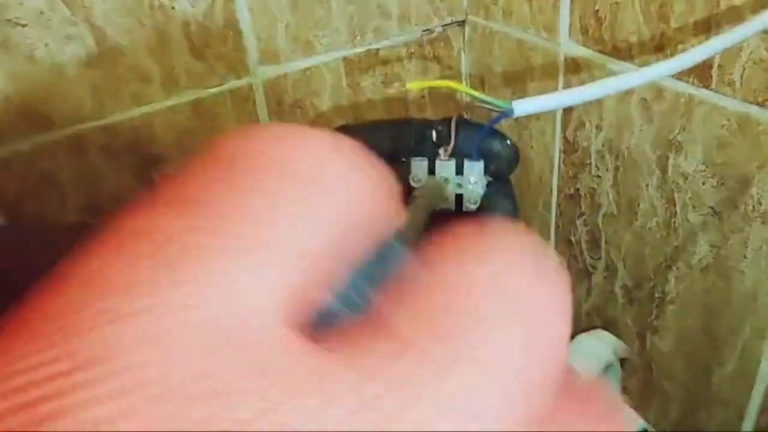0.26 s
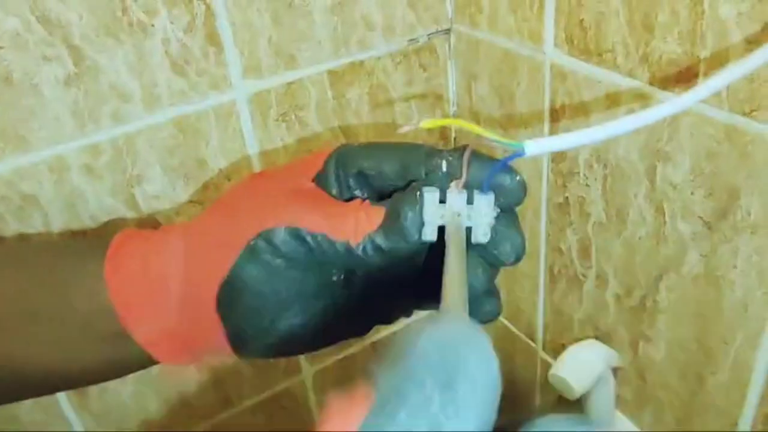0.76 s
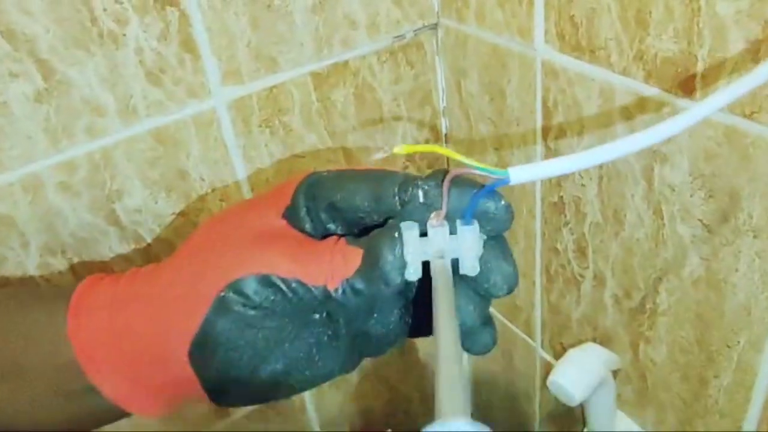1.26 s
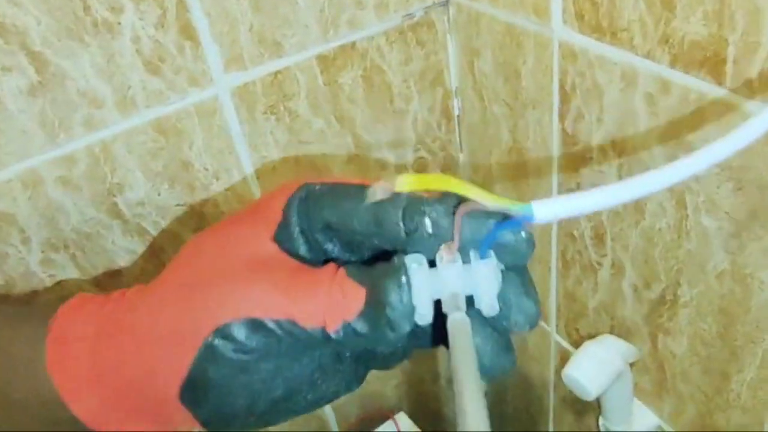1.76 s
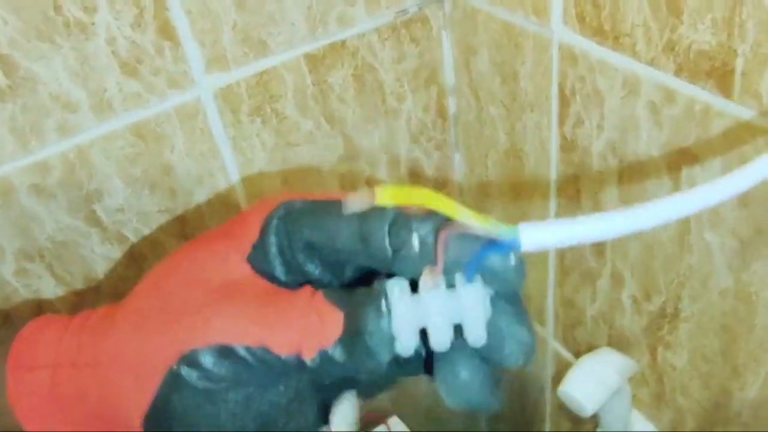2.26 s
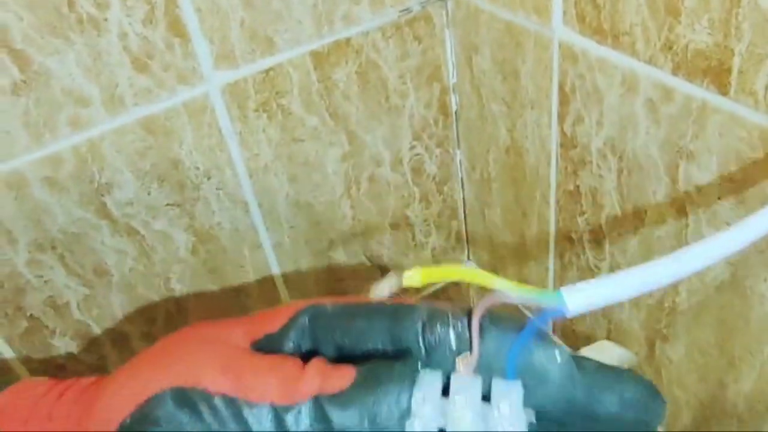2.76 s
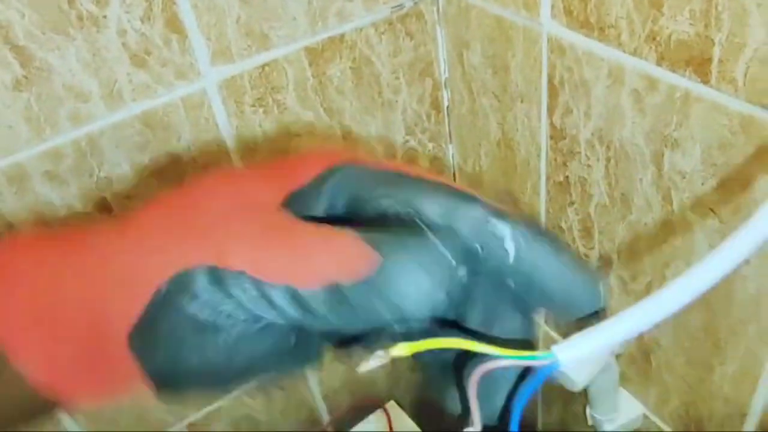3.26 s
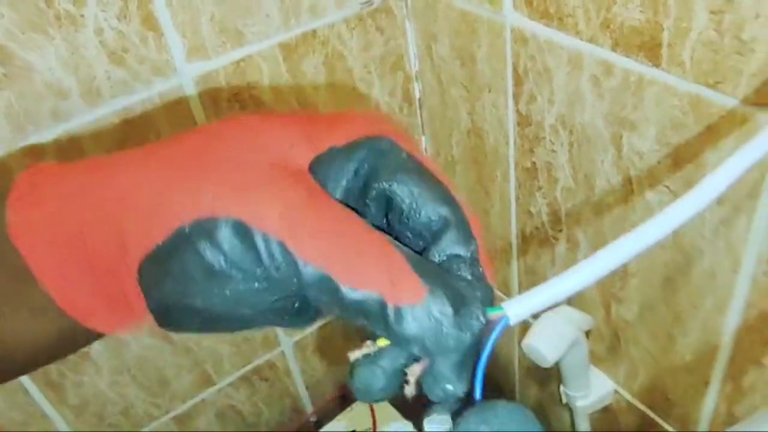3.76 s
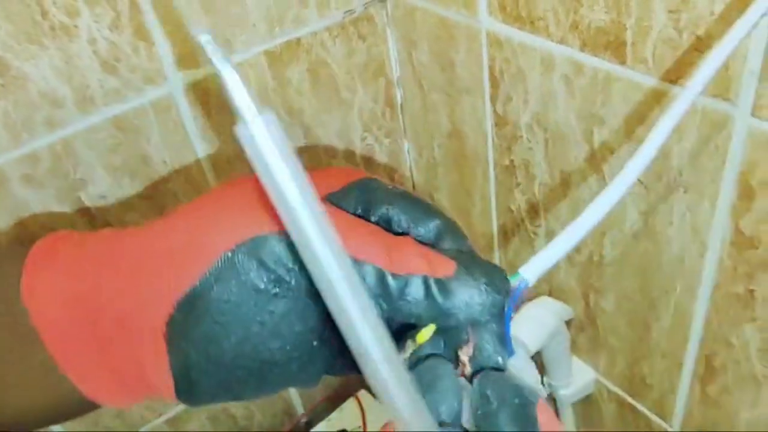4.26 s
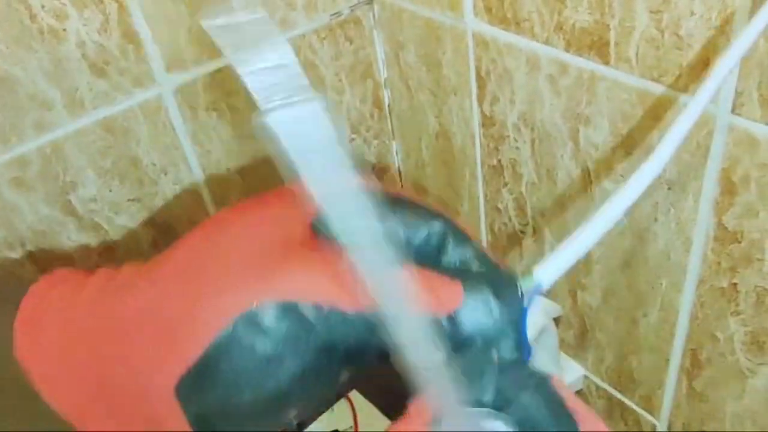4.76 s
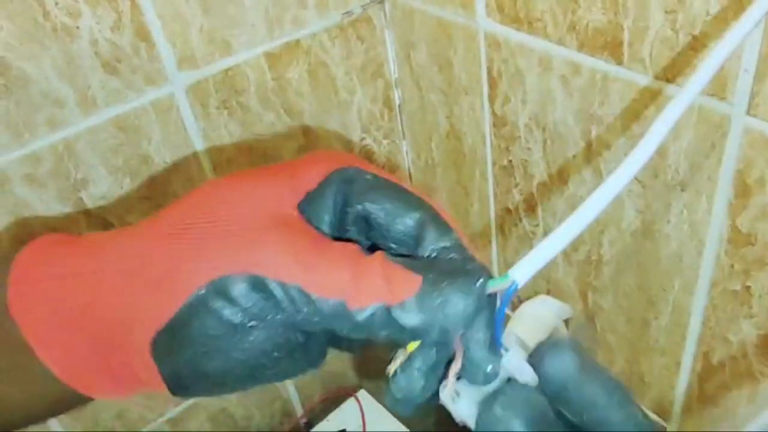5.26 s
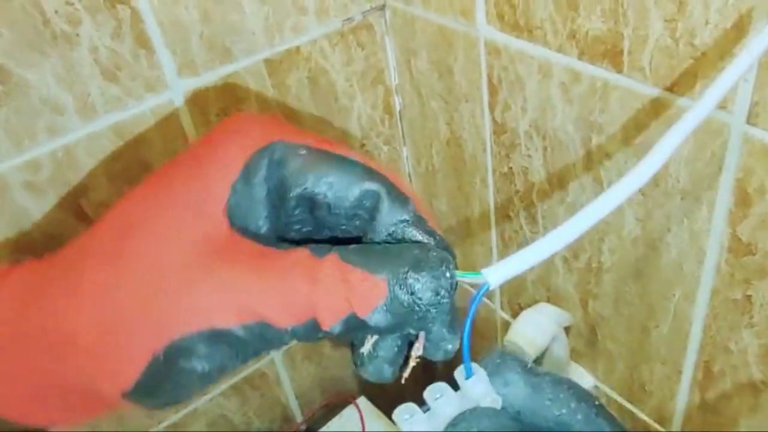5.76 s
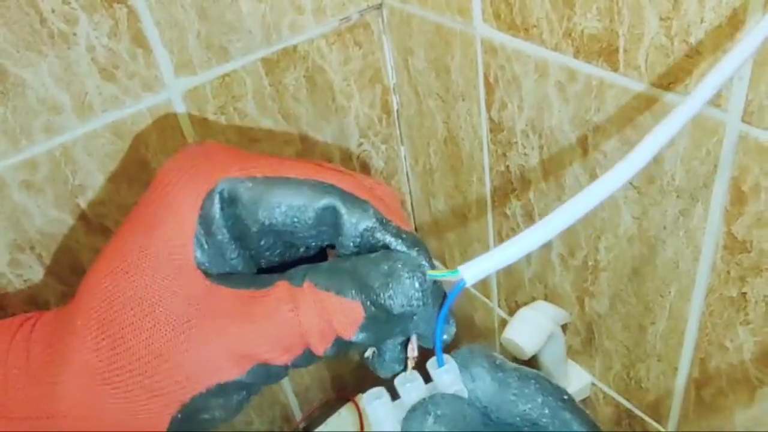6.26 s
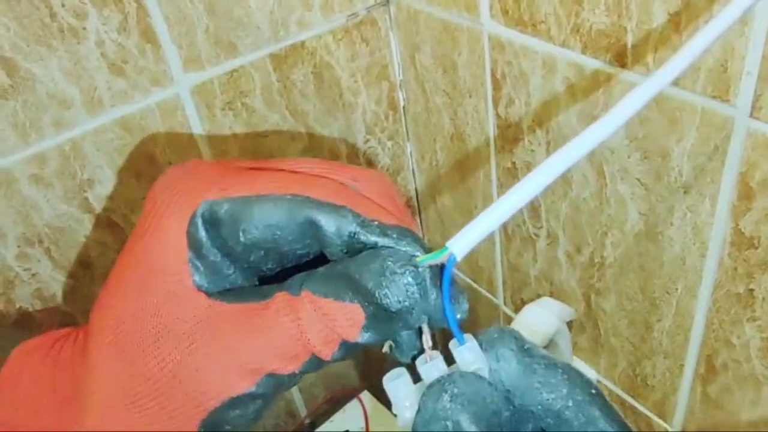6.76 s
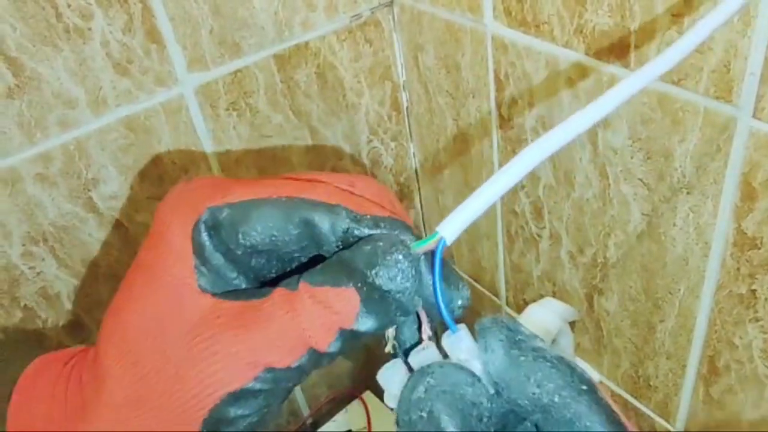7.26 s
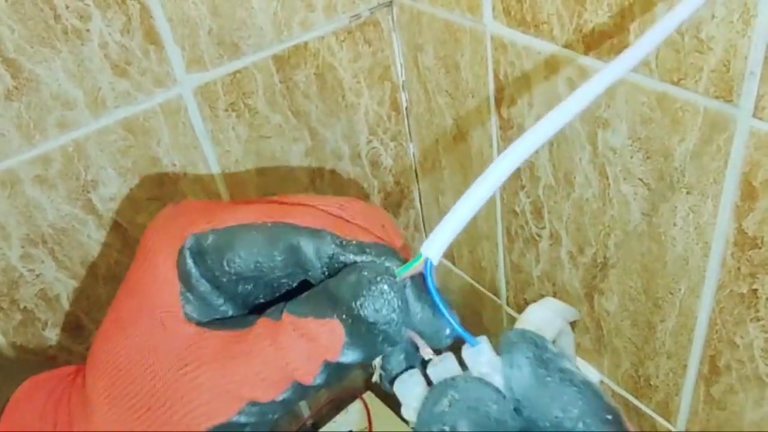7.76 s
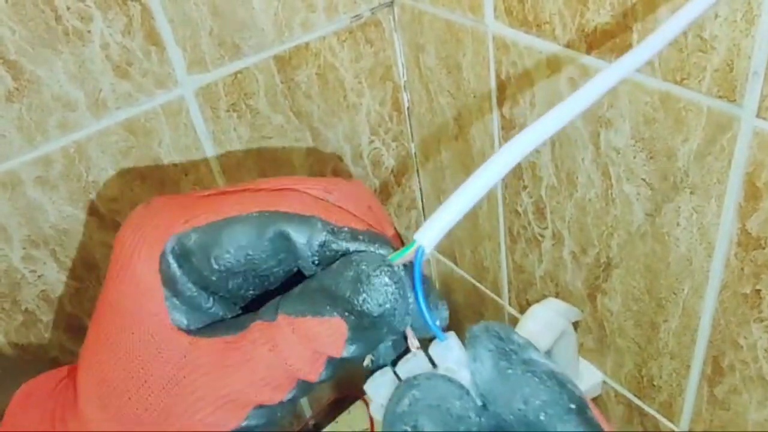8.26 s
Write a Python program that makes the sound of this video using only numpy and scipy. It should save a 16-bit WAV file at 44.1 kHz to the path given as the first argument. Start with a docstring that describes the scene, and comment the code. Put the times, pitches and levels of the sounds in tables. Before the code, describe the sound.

Quick scratchy screwdriver twists and plastic clicks give way to lighter glove rustling and wire ticks, with a low electrical hum indoors.

```python
"""Mains hum and a low rush of air fill a small tiled room throughout. For the first two seconds or so,
rubber-coated gloves spin a screwdriver in a plastic terminal block, about four twists a second: the
coating rasps and crunches by stick-slip friction, while blade, screw and plastic click on impact.
Near 2.5 s a glove slides along the block as the blade is drawn out. The block is then brushed and knocked,
and last the wire ends tick faintly. Two close microphones add their own port resonances and hiss."""
import sys
import numpy as np
from scipy import signal
from scipy.fft import rfft, irfft, next_fast_len
from scipy.io import wavfile
from scipy.ndimage import uniform_filter1d, map_coordinates

SR = 44100
rng = np.random.default_rng(int(sys.argv[2]) if len(sys.argv) > 2 else 0)


def bounce(signal):
    """Save signal as a 16-bit WAV file at the path given by the first command-line argument."""
    frames = np.transpose(np.atleast_2d(signal))
    limited = np.clip(frames, -1, 1)
    pcm = np.round(limited * 32767).astype(np.int16)
    wavfile.write(sys.argv[1], SR, pcm)


N = 375291

# Spectral shape of the steady air noise: frequency_hz, density_db
AIR_SPECTRUM = [(20, -3.5), (30, -11), (60, -3.5), (100, 2.5), (170, -6), (270, -13), (500, -15.5),
                (900, -20.5), (1150, -36), (1700, -36.5), (3000, -47.5), (8000, -65.5)]
# Room resonances that lift the air noise: centre_hz, width_hz, lift_db
ROOM_MODES = [(86.3, 12.8, 12.5), (111.2, 3.6, 13), (147, 28, 4), (223.8, 22, 10), (315.4, 26, 9),
              (370.2, 8.9, 7), (430.5, 16, 8.5), (583, 9.7, 9.5)]
# Left-right likeness of the air noise: frequency_hz, coherence (0 to 1)
AIR_COHERENCE = [(30, .88), (90, .97), (240, .8), (480, .66), (950, .52), (1900, .05)]
# Room resonances that waver in strength: centre_hz, width_hz, level_db
DRONE_BANDS = [(733, 70, -61.5), (808, 91, -66), (1038, 89, -68), (1328, 61, -72.5), (1401, 40, -70.5),
               (1500, 17, -71), (2570, 120, -85.5)]
# Faint tones in the room: pitch_hz, level_db
WHINE_TONES = [(1502, -78.5), (2590, -86), (5085, -93)]
# Partials of the mains hum: pitch_hz, level_db, pan_db (left over right, as in every table)
HUM_PARTIALS = [(100.23, -29.5, 3), (200.4, -49, 7)]
# Reverberation time of the tiled room: frequency_hz, t60_s
ROOM_DECAY = [(200, 0.085), (1500, 0.15), (4000, 0.155), (12000, 0.14)]
# Spectral shape of a small hard contact on damped plastic: frequency_hz, density_db
TAP_SPECTRUM = [(200, -23), (700, -3.5), (1400, -5), (2300, 1.5), (4000, 1), (7000, -2), (11000, -5.5),
                (15000, -3.5)]
# Spectral shape of rubber rubbing on plastic: frequency_hz, density_db
FRICTION_SPECTRUM = [(150, -37), (400, 7.5), (750, 6), (1300, 7), (2400, 6), (4500, 2.5), (7000, 3),
                     (11000, -7.5), (15000, -7)]
# Wire ends scraping on glove and block: time_s, level_db, body_db, pan_db
WIRE_TICKS = [(3.788, -49, -8, -2), (3.807, -49.5, -13, -11), (3.824, -43, -23, -11.5),
              (4.024, -45, 18, -0.5), (4.052, -58.5, 8, -12), (4.068, -48.5, 12, -9), (6.306, -57, -14, 0),
              (6.789, -58.5, 5, 11), (7.158, -55.5, -18, 12), (7.2565, -49, -4, 0), (7.337, -52, -12, -8),
              (7.351, -52, -11, 0), (7.4795, -59.5, 0, 18), (8.1105, -61, 6, 8), (8.1955, -54.5, -10, 7),
              (8.3422, -50.5, -3, -1), (8.446, -53.5, -8, 2)]
# Envelope of the glove's slide along the block: time_s, level_db
SLIDE_ENVELOPE = [(2.4, -70.5), (2.5, -58), (2.555, -57.5), (2.668, -54.5), (2.764, -49.5), (2.869, -56),
                  (2.929, -60), (2.982, -52), (3.1, -81)]
# Glove brushing block and wires: full_pressure_s, level_db, length_s, body_db
BRUSHES = [(2.824, -34.5, 0.028, -7.5), (3.154, -50.5, 0.022, 3), (3.206, -49.5, 0.086, 11),
           (3.279, -49, 0.023, 8.5), (3.824, -65.5, 0.12, 2.5), (3.873, -66, 0.067, 12),
           (3.94, -58.5, 0.051, 11), (4.046, -59.5, 0.15, 11), (4.883, -48, 0.026, -8.5),
           (4.925, -45.5, 0.11, 11.5), (5.099, -64, 0.28, 1), (5.19, -48, 0.07, -9.5),
           (5.238, -39.5, 0.066, -3.5), (5.374, -59.5, 0.052, 4), (5.474, -57.5, 0.1, 1)]
# Modes of the hand-held plastic: pitch_hz, level_db, t60_s
PLASTIC_MODES = [(805, -12.5, 0.042), (905, 1.5, 0.0092), (1290, 0, 0.009), (1520, -2.5, 0.013),
                 (1940, 7.5, 0.0057), (2220, 6, 0.005), (2650, -9.5, 0.0096)]
# Block and handle knocking against the palm: start_s, level_db, brightest_hz
KNOCKS = [(0.513, -14.5, 1250), (0.979, -23, 970), (0.994, -28, 900), (1.051, -26.5, 1180),
          (1.063, -29, 1900), (1.2368, -20, 1020), (1.321, -24, 1280), (1.5168, -18.5, 1280),
          (1.584, -35, 2100), (2.4845, -19.5, 2150), (2.622, -29.5, 1050), (2.9968, -31, 2600),
          (3.172, -24, 1550), (3.285, -39.5, 2300), (4.923, -13.5, 1950)]
# Firm contacts of blade, screw, block and wire: time_s, level_db, body_db, pan_db
CLICKS = [(0.184, -29.5, -2, 8), (0.2191, -33, 11, 0), (0.477, -26.5, -9.5, 5.5), (0.5052, -22.5, 1, -8.5),
          (0.527, -36.5, 14, 1), (0.550, -29, -23, 14), (0.6615, -28, -4, 4), (0.697, -33, -2, 2.5),
          (0.7142, -19.5, -0.5, 4), (0.733, -30.5, -9, 6), (0.9643, -28.5, 7, 1.5), (0.9805, -20, 4, 5),
          (0.9926, -24, -7, 7.5), (1.051, -36.5, 12, 3), (1.237, -18.5, 7, 1.5), (1.271, -24.5, -2, 6.5),
          (1.321, -28, -7, 4), (1.482, -32.5, 2, 3.5), (1.4952, -30, 6.5, 5.5), (1.5288, -20, -10, -2),
          (1.757, -26, -7, 1), (1.769, -24, -5, 3), (1.8314, -26.5, -2, 2.5), (1.841, -30.5, 10, 3.5),
          (2.017, -29, 9, 6), (2.0843, -29, 8, 8), (2.476, -34.5, -1, 5.5), (2.4852, -29, 4, 1.5),
          (2.618, -31.5, 2, 6), (2.745, -25, 6, -5.5), (2.895, -36, 6, -5.5), (3.173, -30.5, 7, 0),
          (3.219, -34, -18, 7.5), (3.7876, -47.5, -6, 0), (4.6353, -52.5, 9, -5.5), (4.9024, -31, 11.5, -2),
          (4.9197, -22.5, 7.5, -5), (4.9232, -18.5, -3, 3.5)]
# Runs of slips as the rubber lets go: start_s, length_s, start_hz, end_hz, level_db
CRUNCHES = [(0.188, 0.007, 4440, 3960, -29.5), (0.499, 0.012, 5400, 3200, -32),
            (0.509, 0.009, 2750, 1220, -28.5), (0.948, 0.009, 4530, 3600, -31),
            (1.195, 0.009, 4300, 2700, -35), (1.205, 0.013, 4660, 3640, -25.5),
            (1.507, 0.008, 6940, 5200, -17.5), (1.511, 0.007, 5000, 3970, -21),
            (1.988, 0.014, 2760, 1980, -23.5), (2.814, 0.013, 7300, 5630, -27),
            (2.827, 0.011, 3420, 1630, -32.5)]
# Turns of the handle: full_pressure_s, level_db, attack_s, hold_s, body_db, regrip_after_s, regrip_db
TWISTS = [(0.088, -45.5, 0.094, 0.042, -5, 0.11, -44), (0.392, -29.5, 0.041, 0.011, -13, 0.12, -44.5),
          (0.501, -30, 0.037, 0.0052, -3, 0.063, -45.5), (0.658, -31, 0.02, 0.0086, -3, 0.051, -44.5),
          (0.719, -34.5, 0.067, 0.011, -10, 0.051, -44), (0.983, -29.5, 0.055, 0.012, -9, 0.066, -42),
          (1.218, -32, 0.034, 0.04, -4.5, 0.096, -43), (1.508, -27.5, 0.039, 0.0072, -3, 0.075, -43),
          (1.744, -28, 0.022, 0.032, -7, 0.092, -42), (2.011, -27, 0.036, 0.014, -3.5, 0.075, -47),
          (2.245, -40, 0.023, 0.026, 1.5, 0.095, -60)]
# Response of each microphone: frequency_hz, gain_db
LEFT_RESPONSE = [(500, -2.5), (800, 0), (1300, -2.5), (2000, 2), (2700, 7), (3600, 4.5), (5000, 7),
                 (6000, 8.5), (6900, 14.5), (7500, 9.5), (8200, -8), (9000, -19), (10200, -18),
                 (12500, -12), (14000, -21)]
RIGHT_RESPONSE = [(500, -0.5), (1500, -0.5), (3000, -1.5), (4200, 0.5), (5400, -2.5), (6200, -4),
                  (7200, -6.5), (8300, -21.5), (9200, -7.5), (10000, 7), (11500, 8.5), (13000, -2.5),
                  (15000, -22.5)]
# Spectral shape of each microphone's self-noise: frequency_hz, density_db
LEFT_HISS = [(500, -10), (1400, 2), (2100, -1), (2600, 0.5), (3700, -11.5), (4800, -8.5), (5700, -20.5),
             (6700, -2), (7200, -2), (7900, -33.5), (9000, -37)]
RIGHT_HISS = [(500, -11), (2400, 8.5), (3500, -10), (4700, 1), (5500, -10.5), (6200, -5), (8500, -17),
              (10000, -10), (11200, -1), (13000, -10.5), (15000, -13.5)]

BLOCK_PAN_DB = 4  # the block is held a little to the left


def amp(db):
    return 10 ** (np.asarray(db) / 20)


def unit_rms(x):
    return x / np.sqrt(np.mean(x ** 2) + 1e-20)


def along(points, hz):
    """Interpolation of (frequency_hz, value) points on a logarithmic axis."""
    knots_hz, values = np.transpose(points)
    return np.interp(np.log(hz + 1), np.log(knots_hz + 1), values)


def wobble(rate_hz, size=N):
    """Smooth random modulation: a spline through rate_hz knots a second."""
    knots = rng.standard_normal(int(size * rate_hz / SR) + 4)
    return map_coordinates(knots, [np.arange(size) * rate_hz / SR])


def filtered(x, response):
    """Linear filtering: the spectrum is multiplied by response(hz)."""
    size = x.shape[-1]
    padded = next_fast_len(size + 2048)
    return irfft(rfft(x, padded) * response(np.fft.rfftfreq(padded, 1 / SR)), padded)[..., :size]


def add(track, start_s, sound, pan_db=0):
    """Superposition of a sound on a stereo track, panned by level difference."""
    start = round(start_s * SR)
    part = sound[..., max(-start, 0):N - start]
    track[:, max(start, 0):][:, :part.shape[-1]] += amp([[pan_db / 2], [-pan_db / 2]]) * part


def add_centred(track, middle_s, sound, pan_db):
    add(track, middle_s - sound.shape[-1] / SR / 2, sound, pan_db)


def resonance(hz, centre_hz, width_hz):
    """A Lorentzian peak of unit height."""
    return 1 / (1 + (2 * (hz - centre_hz) / width_hz) ** 2)


def air(level_db=-40):
    """Room modes colour a steady low rush; high coherence makes its bass nearly mono."""
    def mid_side_response(hz):
        lift_db = sum(db * resonance(hz, centre, width) for centre, width, db in ROOM_MODES)
        angle = np.arccos(np.clip(along(AIR_COHERENCE, hz), -1, 1)) / 2
        return amp(along(AIR_SPECTRUM, hz) + lift_db) * [np.cos(angle), np.sin(angle)]
    mid, side = filtered(rng.standard_normal((2, N)), mid_side_response)
    return amp(level_db) * unit_rms(np.array([mid + side, mid - side]))


def drones(side_db=-7, waver_db=2.2):
    """Room resonances pass narrow bands of noise, each wavering independently."""
    out = np.zeros((2, N))
    for centre, width, db in DRONE_BANDS:
        mid, side = filtered(rng.standard_normal((2, N)), lambda hz: resonance(hz, centre, width))
        pair = np.array([mid + amp(side_db) * side, mid - amp(side_db) * side])
        out += amp(db) * unit_rms(pair * amp(waver_db * wobble(rate_hz=11)))
    return out


def whines(waver_db=5.5, pitch_wander=0.007):
    """Random amplitude and frequency modulation make thin tones waver."""
    out = np.zeros(N)
    for hz, db in WHINE_TONES:
        level = amp(db + waver_db * wobble(rate_hz=5.8))
        pitch_hz = hz * (1 + pitch_wander * wobble(rate_hz=60))
        out += np.sqrt(2) * level * np.sin(2 * np.pi * np.cumsum(pitch_hz) / SR)
    return out


def mains_hum(waver_db=0.06, drift_rad=0.015):
    """Harmonics at twice and four times the mains frequency, very slightly unsteady."""
    out, t = np.zeros((2, N)), np.arange(N) / SR
    for hz, db, pan_db in HUM_PARTIALS:
        phase = 2 * np.pi * (hz * t + rng.random()) + drift_rad * wobble(rate_hz=1)
        level = amp(db + waver_db * wobble(rate_hz=1.4))
        add(out, 0, np.sqrt(2) * level * np.sin(phase), pan_db)
    return out


def tiled_room(x, wet_db, build_up_s=0.0041):
    """Reverberation: a short diffuse tail for each microphone, renewed as the hands move."""
    wet, hop = np.zeros((2, N)), SR // 8
    for start in range(0, N, hop):
        hz, t, noise = signal.stft(rng.standard_normal((2, SR // 4)), SR, nperseg=256)
        decay = amp(-60 * t / along(ROOM_DECAY, hz)[:, None])
        tail = signal.istft(noise * decay, SR, nperseg=256)[1]
        tail *= np.minimum(np.arange(tail.shape[1]) / SR / build_up_s, 1)
        tail /= np.linalg.norm(tail[0])
        add(wet, start / SR, signal.fftconvolve(x[:, start:start + hop], tail, axes=1))
    return x + amp(wet_db) * wet


def around_hands(x, max_delay_s=0.00024):
    """Diffraction round the hands: each band reaches each microphone with its own group delay."""
    def all_pass(hz):
        knots_hz = np.linspace(0, SR / 2, num=24)
        delay_s = max_delay_s * np.array([np.interp(hz, knots_hz, rng.random(24)) for side in "LR"])
        return np.exp(-2j * np.pi * np.cumsum(delay_s, axis=1) * hz[1])
    return filtered(x, all_pass)


def tap(body_db, rise_t60_s=0.022, decay_t60_s=0.011):
    """A transient, heard as a short click with a soft onset: noise swells briefly, then dies quickly."""
    t = np.arange(-SR // 25, SR // 25) / SR
    envelope = amp(-60 * np.abs(t) / np.where(t < 0, rise_t60_s, decay_t60_s))
    burst = envelope * rng.standard_normal(len(t))
    body = [(2400, body_db), (4200, 0.011)]  # firmer contacts bring out the body of the plastic
    click = filtered(burst, lambda hz: amp(along(TAP_SPECTRUM, hz) + along(body, hz)))
    return around_hands(click, max_delay_s=0.000615)


def squeal(x, depth_db=3.5):
    """Friction-induced vibration: spots of rubber sing for milliseconds, each at its own pitch."""
    spectrogram = signal.stft(x, nperseg=256)[2]
    spots = uniform_filter1d(rng.standard_normal(spectrogram.shape), size=4, axis=0)
    spots = uniform_filter1d(spots, size=2, axis=1)
    singing = signal.istft(spectrogram * amp(depth_db * unit_rms(spots)), nperseg=256)[1]
    return unit_rms(singing[:len(x)])


def hand_cavity(x, depth_db=1.5, spacing_hz=330):
    """Cavity resonance: each grip gives the hollow of the hand new peaks and notches."""
    knots = rng.standard_normal(int(SR / 2 / spacing_hz) + 4)
    ripple = lambda hz: amp(depth_db * np.tanh(map_coordinates(knots, [hz / spacing_hz])))
    return unit_rms(filtered(x, ripple))


def impulses(size, rate_hz):
    """A Poisson train of unit impulses with random signs."""
    return (rng.random(size) < rate_hz / SR) * rng.choice([-1, 1], size)


def snags(size, level_db=-7, spread_db=0.5):
    """Sparse stick-slip: the coating catches harder and lets go with a crackle."""
    crackle = impulses(size, rate_hz=55) * amp(spread_db * np.tanh(rng.standard_normal(size)))
    return amp(level_db) * unit_rms(crackle)


def friction(size, body_db, rasp_db, fizz_db, judder_db=1.5, judder_hz=170):
    """Stick-slip of rubber on plastic: tiny slips whose level judders as it catches and lets go."""
    slips = unit_rms(impulses(size, rate_hz=900)) + 0.6 * rng.standard_normal(size)
    drag = hand_cavity(squeal(slips) + snags(size))
    colour = [(1350, body_db), (2350, rasp_db), (3400, rasp_db / 2), (4800, rasp_db / 2),
              (7000, 0), (10500, fizz_db)]
    rasp = filtered(drag, lambda hz: amp(along(FRICTION_SPECTRUM, hz) + along(colour, hz)))
    judder = unit_rms(amp(judder_db * np.tanh(wobble(judder_hz, size))))
    return rasp * judder


def stroke(attack_s, hold_s, release_s, body_db, rasp_db, fizz_db=3):
    """Friction follows pressure: it rises 20 dB per attack_s, holds, and falls 20 dB per release_s."""
    t = np.arange(-SR // 4, SR // 4) / SR
    swell = amp(-20 * (np.maximum(-t, 0) / attack_s + np.maximum(t - hold_s, 0) / release_s))
    return around_hands(friction(len(t), body_db, rasp_db, fizz_db) * swell, max_delay_s=0.00115)


def rustle(level_db=-68.5):
    """Light friction of the knitted cuff and glove, lasting until the slide begins."""
    out = np.zeros((2, N))
    size = round(SLIDE_ENVELOPE[0][0] * SR)
    rub = friction(size, body_db=3, rasp_db=4, fizz_db=-9)
    add(out, 0, amp(level_db) * rub * signal.windows.tukey(size, 0.1), BLOCK_PAN_DB)
    return out


def wire_ticks(gain_db=-5):
    """Contact transients of copper strands catching on plastic: softer and longer than clicks."""
    out = np.zeros((2, N))
    for time_s, db, body_db, pan_db in WIRE_TICKS:
        tick = tap(body_db, rise_t60_s=0.03, decay_t60_s=0.036)
        add_centred(out, time_s, amp(db + gain_db) * tick, pan_db)
    return out


def slide():
    """Sliding friction: one long, light drag of the glove along the block."""
    out = np.zeros((2, N))
    times_s, levels_db = np.transpose(SLIDE_ENVELOPE)
    t = np.arange(times_s[0], times_s[-1], 1 / SR)
    envelope = amp(np.interp(t, times_s, levels_db))
    drag = envelope * friction(len(t), body_db=-1, rasp_db=1, fizz_db=6)
    add(out, times_s[0], around_hands(drag, max_delay_s=0.0012), pan_db=7)
    return out


def brushes(gain_db=-3):
    """Friction under a loose touch: raspy glove strokes as the block is moved to the next wire."""
    out = np.zeros((2, N))
    for time_s, db, length_s, body_db in BRUSHES:
        fizz_db = 5 - 0.67 * body_db  # a fuller, softer touch is duller
        brush = stroke(attack_s=0.69 * length_s, hold_s=0.11 * length_s, release_s=0.66 * length_s,
                       body_db=body_db, rasp_db=9.5, fizz_db=fizz_db)
        add_centred(out, time_s, amp(db + gain_db) * brush, BLOCK_PAN_DB)
    return out


def knocks(attack_s=0.00041, fall_db_per_octave=10, spread_db=2):
    """Modal ringing of plastic, damped by the glove; the firmness of the impact selects the modes."""
    out, t = np.zeros((2, N)), np.arange(SR // 20) / SR
    hz, mode_db, t60_s = np.transpose(PLASTIC_MODES)[..., None]
    for start_s, db, brightest_hz in KNOCKS:
        excited_db = mode_db - fall_db_per_octave * np.abs(np.log2(hz / brightest_hz))
        excited_db += spread_db * rng.standard_normal(hz.shape)
        modes = amp(excited_db - 60 * t / t60_s) * np.sin(2 * np.pi * hz * t)
        ring = modes.sum(axis=0) * (1 - np.exp(-t / attack_s))
        add(out, start_s, around_hands(amp(db) * ring / np.abs(ring).max()))
    return out


def clicks(gain_db=-3):
    """Brief impacts of blade, screw, block and wire radiate broadband transients."""
    out = np.zeros((2, N))
    for time_s, db, body_db, pan_db in CLICKS:
        add_centred(out, time_s, amp(db + gain_db) * tap(body_db), pan_db)
    return out


def crunches(gain_db=-6, slip_rate_hz=1500, pitch_spread=0.12, size_spread_db=3, t60_cycles=14):
    """Stick-slip release: a quick run of damped oscillations whose scattered pitches sink."""
    out, t = np.zeros((2, N)), np.arange(SR // 16) / SR
    for start_s, length_s, start_hz, end_hz, db in CRUNCHES:
        count = max(round(slip_rate_hz * length_s), 2)
        progress = (np.arange(count) + rng.random(count))[:, None] / count
        detune, strength = rng.standard_normal((count, 2)).T[..., None]
        hz = start_hz * (end_hz / start_hz) ** progress * np.exp(pitch_spread * detune)
        cycles = hz * np.maximum(t - progress * length_s, 0)
        swell = np.sqrt(np.sin(np.pi * progress))
        envelope = np.minimum(cycles, 1) * amp(size_spread_db * strength - 60 * cycles / t60_cycles)
        run = np.sum(swell * envelope * np.sin(2 * np.pi * cycles), axis=0)
        run /= np.sqrt(2 * np.sum(run ** 2) / (length_s * SR))
        add(out, start_s, around_hands(amp(db + gain_db) * run))
    return out


def twists(gain_db=-3, settle_after_s=0.155):
    """Friction, then impact: the glove rasps round the handle, the fingers land, the blade settles."""
    out = np.zeros((2, N))
    for time_s, db, attack_s, hold_s, body_db, regrip_after_s, regrip_db in TWISTS:
        turn = amp(db) * stroke(attack_s, hold_s, release_s=0.03, body_db=body_db, rasp_db=-1.5)
        regrip = amp(regrip_db) * stroke(attack_s=0.049, hold_s=0, release_s=0.012, body_db=5.5, rasp_db=4)
        landing = amp(regrip_db + 6) * tap(body_db=10)
        settling = amp(-56) * tap(body_db=14)
        regrip_s = time_s + regrip_after_s
        settle_s = time_s + hold_s / 2 + settle_after_s
        for when_s, sound in [(time_s, turn), (regrip_s, regrip), (regrip_s, landing), (settle_s, settling)]:
            add_centred(out, when_s, amp(gain_db) * sound, pan_db=2)
    return out


def scene():
    """Superposition of the room's steady background and the reverberant handwork."""
    background = mains_hum() + whines() + drones() + air()
    rubbing = twists() + rustle() + slide() + brushes() + crunches() + wire_ticks()
    impacts = knocks() + clicks()
    return background + tiled_room(rubbing, wet_db=-6) + tiled_room(impacts, wet_db=-7)


def microphone(x, response, hiss_spectrum, hiss_db):
    """Port resonances colour the sound; the capsule adds its self-noise."""
    hiss = unit_rms(filtered(rng.standard_normal(N), lambda hz: amp(along(hiss_spectrum, hz))))
    return filtered(x, lambda hz: amp(along(response, hz))) + amp(hiss_db) * hiss


def record(dry):
    """Transduction by two unlike microphones, band-limited to 15.4 kHz."""
    left = microphone(dry[0], LEFT_RESPONSE, LEFT_HISS, hiss_db=-58.5)
    right = microphone(dry[1], RIGHT_RESPONSE, RIGHT_HISS, hiss_db=-79)
    return filtered(np.array([left, right]), lambda hz: hz < 15400)


dry = scene()
out = record(dry)
bounce(out)
```